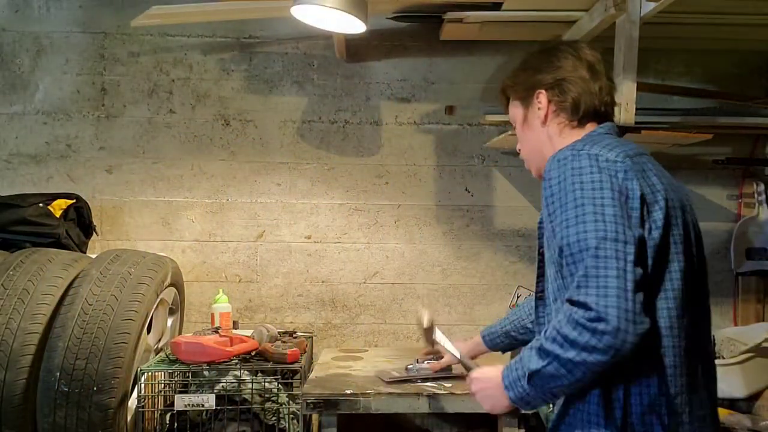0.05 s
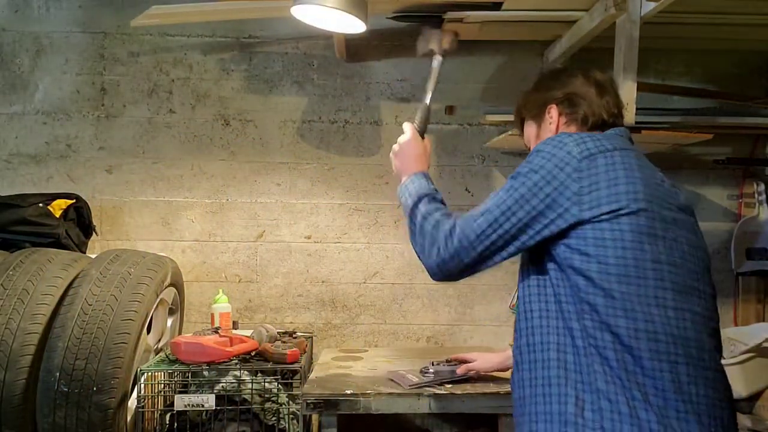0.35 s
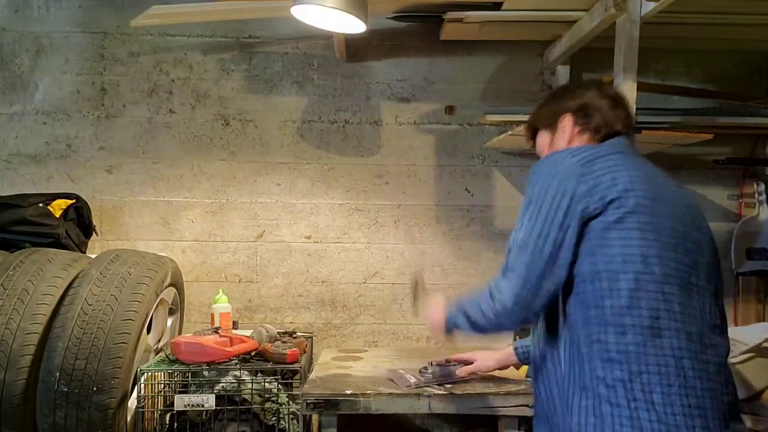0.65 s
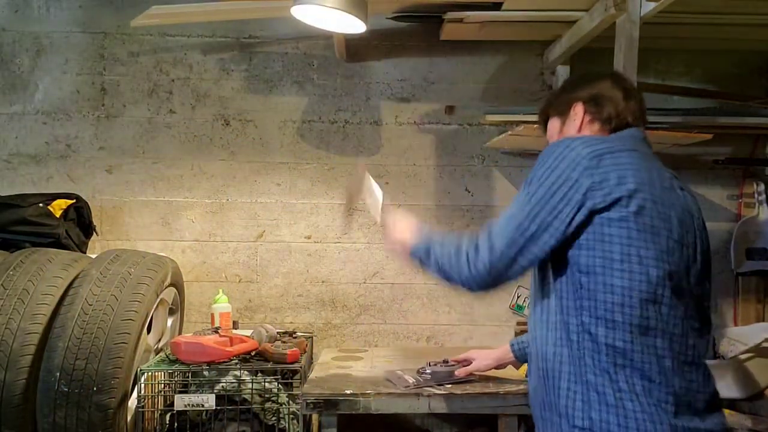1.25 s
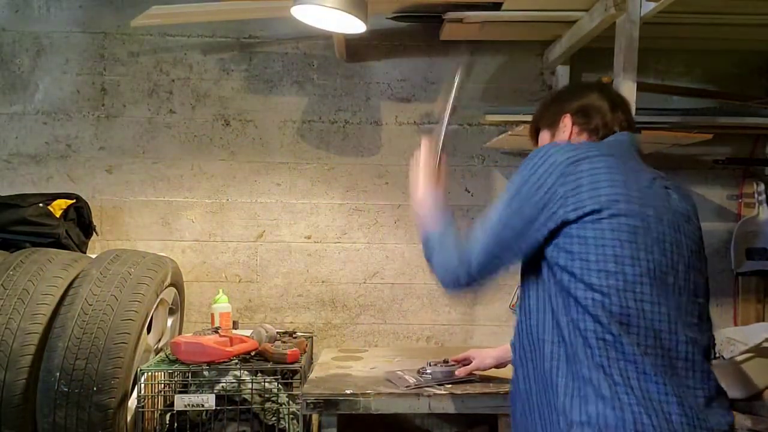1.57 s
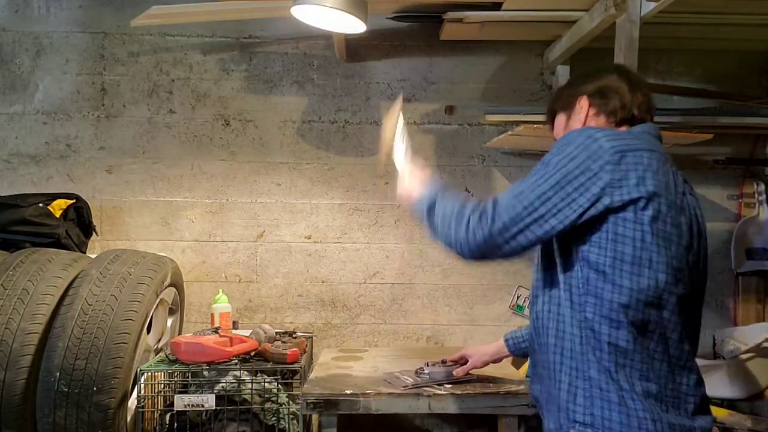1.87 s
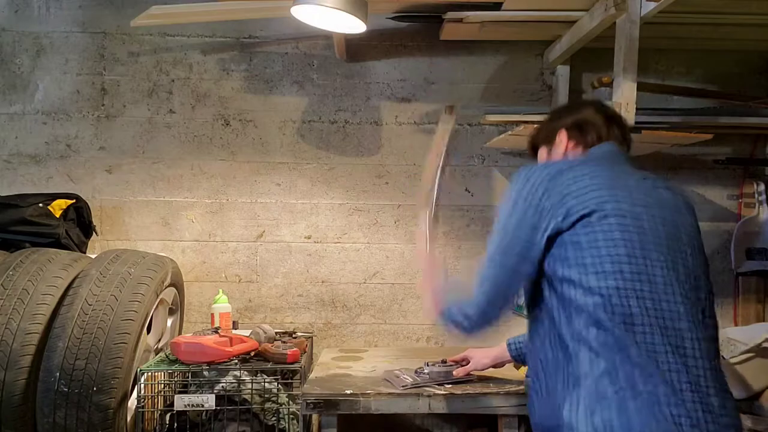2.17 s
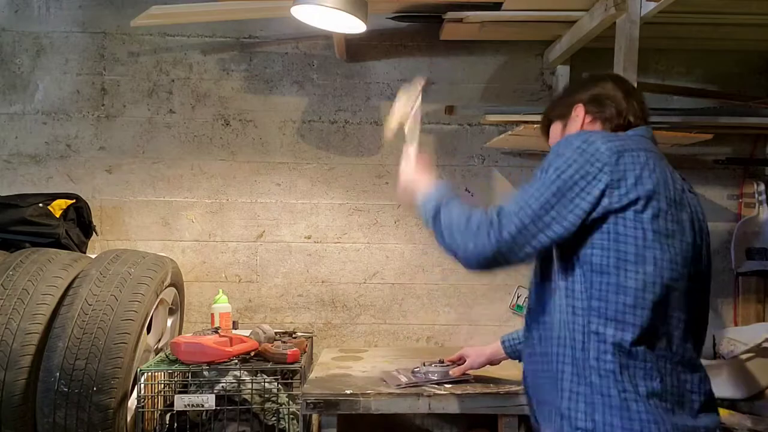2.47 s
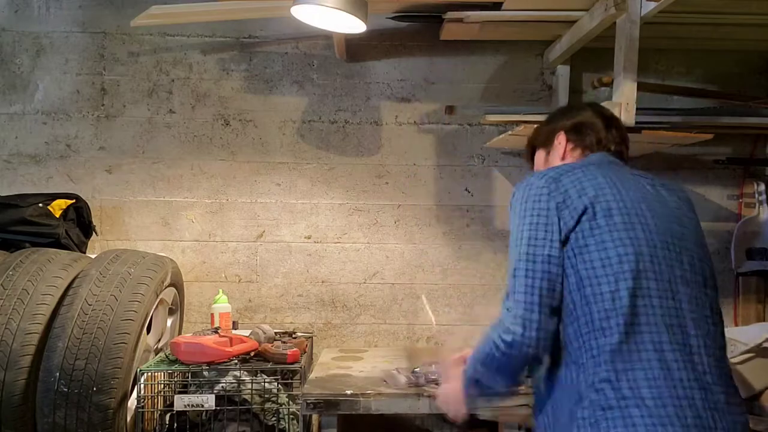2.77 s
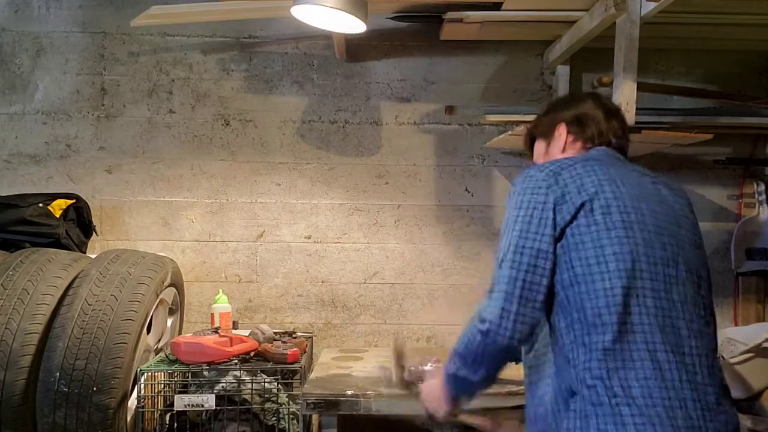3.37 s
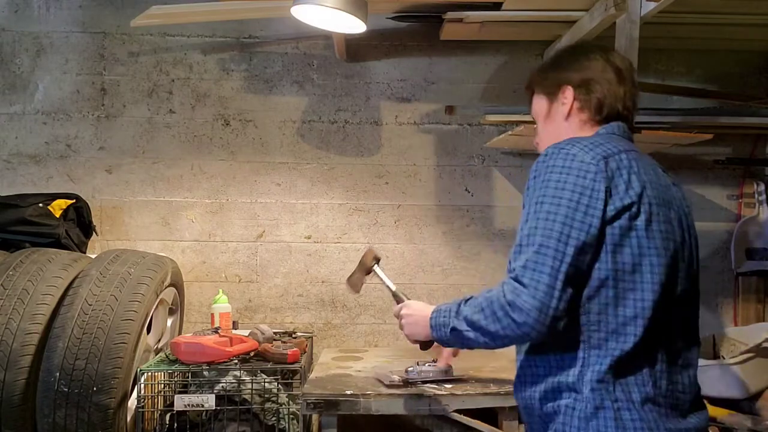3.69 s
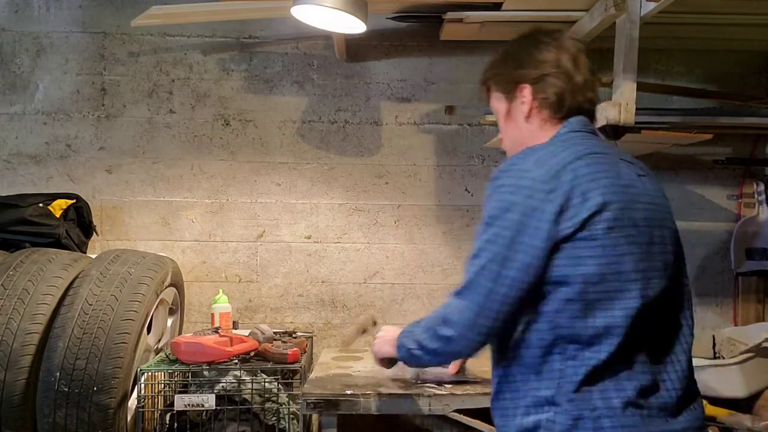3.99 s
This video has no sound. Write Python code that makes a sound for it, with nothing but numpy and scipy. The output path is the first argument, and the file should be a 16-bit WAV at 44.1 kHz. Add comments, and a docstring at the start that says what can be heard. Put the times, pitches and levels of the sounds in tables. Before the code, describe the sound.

In a small workshop, two light knocks sound on a wooden bench. Then a hammer strikes a plastic blister pack six times, about two blows a second. Each loud hit booms in the wood, cracks in the plastic and rings briefly in the room, overloading the close microphone. The pack snaps on the fourth blow and crinkles faintly after the last two. A few light knocks and a short scrape follow.

```python
"""In a small block-walled workshop, a plastic blister pack and a hammer are shifted on a wooden bench
with two light knocks. The hammer comes down six times: each blow booms in the bench, cracks in the pack,
leaves the room ringing and overloads the close microphone. The pack splits on the fourth blow and
crinkles after the last two as the weight comes off. A few more light knocks and a short scrape
follow, over the low rumble of the room."""
import sys
import numpy as np
from scipy import signal
from scipy.fft import rfft, irfft, next_fast_len
from scipy.io import wavfile

SR = 44100
rng = np.random.default_rng(int(sys.argv[2]) if len(sys.argv) > 2 else 0)


def file_out(sig):
    """Save sig as 16-bit WAV at sys.argv[1]."""
    # one column per channel
    cols = np.atleast_2d(sig).T
    # limit, then scale
    lim = np.clip(cols, -1, 1)
    pcm = np.round(lim * 32767).astype(np.int16)
    wavfile.write(sys.argv[1], SR, pcm)


N = 186851
T = np.arange(SR) / SR  # one second of ringing


def undb(db):
    """Decibels to gain."""
    return 10 ** (np.asarray(db) / 20)


def unit(x):
    """Scale to rms 1."""
    return x / np.sqrt(np.mean(x ** 2))


def read(points, hz):
    """Read a curve of (Hz, value) points on a log-frequency axis."""
    point_hz, value = np.transpose(points)
    return np.interp(np.log(hz), np.log(point_hz), value)


def bell(hz, centre_hz, octaves):
    """A smooth hump over frequency, 1 at its centre."""
    return np.exp(-(np.log2(hz / centre_hz) / octaves) ** 2)


def colour(x, gain):
    """Equalise with a gain that is a function of frequency."""
    n = next_fast_len(x.shape[-1] + SR // 4)
    hz = np.maximum(np.arange(n // 2 + 1) * SR / n, 1)
    return irfft(rfft(x, n) * gain(hz), n)[..., :x.shape[-1]]


def fade(t60):
    """Free decay, 60 dB down after t60 seconds."""
    return np.exp(-np.log(1000) * T / t60)


def swell(seconds):
    """Soft attack while a vibration spreads."""
    return 1 - np.exp(-(T / seconds) ** 2)


def add(track, start_s, sound):
    """Mix a sound into a track."""
    i = max(int(start_s * SR), 0)
    n = min(sound.shape[-1], N - i)
    track[..., i:i + n] += sound[..., :n]


def diffuse(size, spacing_m=0.14):
    """Noise from all sides at two microphone ports: alike in the bass, unrelated in the treble."""
    likeness = lambda hz: np.sinc(2 * hz * spacing_m / 343)
    mid = colour(rng.standard_normal(size), lambda hz: np.sqrt((1 + likeness(hz)) / 2))
    side = colour(rng.standard_normal(size), lambda hz: np.sqrt((1 - likeness(hz)) / 2))
    return np.array([mid + side, mid - side])


def room_tone():
    """The still air of the workshop, a low rumble under everything."""
    # spectrum of the air: frequency_hz, relative_db
    air = [(20, -11), (48, -10), (70, 5.5), (100, -15), (180, -18.5), (250, -26.5), (550, -30),
           (950, -29.5), (1300, -35.5), (2000, -47), (3300, -51), (7000, -55), (16000, -61.5)]
    return unit(colour(diffuse(N), lambda hz: undb(read(air, hz))))


def workshop(spectrum):
    """Dense reverb tail of a short sound with this spectrum; the very top dies first."""
    # reverberation of the workshop: frequency_hz, t60_s
    decays = [(250, 0.33), (1000, 0.31), (2500, 0.32), (4000, 0.28), (7000, 0.43), (15000, 0.23)]
    centres = np.geomspace(250, 16000, 7)
    shares = np.eye(len(centres))
    crossover = lambda hz: np.array([[np.interp(np.log(hz), np.log(centres), row)] for row in shares])
    bands = colour(unit(colour(diffuse(len(T)), spectrum)), crossover)
    return sum(band * fade(read(decays, hz)) for band, hz in zip(bands, centres)) * swell(0.0096)


def burst(spectrum, rise_s, t60, wet_db, uneven_db, grain_samples=32):
    """A dense, uneven train of tiny impacts dies away, followed by the room."""
    grains = undb(uneven_db * np.repeat(rng.random(len(T)), grain_samples)[:len(T)])
    direct = unit(colour(diffuse(len(T)) * grains, spectrum)) * swell(rise_s) * fade(t60)
    return direct + undb(wet_db) * workshop(spectrum)


def ring(modes, excite_db, build_cycles, scatter_db, scatter_rad, apart_hz=650, long_wave_hz=200):
    """Struck modes build up over a few cycles and ring out; neighbours swing opposite ways."""
    out = np.zeros((2, len(T)))
    for k, (hz, db, t60) in enumerate(modes):
        # long waves hardly feel where exactly the blow lands
        size, turn = rng.standard_normal(2) * hz / (hz + long_wave_hz)
        # higher modes reach the two ports out of step
        spread = np.array([[.5], [-.5]]) * rng.standard_normal() * hz / apart_hz
        phase = k * np.pi + scatter_rad * turn + spread
        gain = undb(db + excite_db(hz) + scatter_db * size)
        out += gain * swell(build_cycles / hz) * fade(t60) * np.sin(2 * np.pi * hz * T + phase)
    return out


def bench(excite_db):
    """The wooden bench booms in the modes that a contact excites."""
    # modes of the bench: pitch_hz, level_db, t60_s
    modes = [(43, -18, 0.49), (62, -21.5, 0.39), (83.4, -9, 0.34), (101.5, -9, 0.31), (128.3, -1.5, .35),
             (147.3, -11.5, 0.38), (180.9, -0.5, .32), (197.4, -5, .28), (209.6, -3, 0.32), (227, 0, 0.32),
             (259.7, -14, 0.27), (314.7, -6.5, 0.22), (365, -7.5, 0.23), (385, -3, .27), (424.4, 0.5, 0.26),
             (453.3, -3.5, 0.32), (484.5, -11, 0.41), (524.7, -11.5, 0.34), (555.7, -5, 0.3),
             (618, -4, 0.32), (666, -11, 0.13), (705, -14, 0.27), (792, -17, 0.33), (813, -16.5, 0.35),
             (905, -13.5, .26), (1015, -20.5, 0.43), (1054, -15.5, 0.22), (1207, -23.5, 0.38),
             (1338, -19, 0.35)]
    return undb(-11.5) * ring(modes, excite_db, build_cycles=1.9, scatter_db=2.5, scatter_rad=1.7)


def knock(centre_hz, octaves, rise_s, t60):
    """A light touch wakes one damped band of noise and the bench modes around it."""
    hump_db = lambda hz: -80 * np.log10(1 + (np.log2(hz / centre_hz) / octaves / 2) ** 2)
    touch = burst(lambda hz: undb(hump_db(hz)), rise_s, t60, wet_db=-15, uneven_db=8)
    return touch + undb(-11.5) * bench(hump_db)


def clack(t60):
    """The pack is knocked against the bench: a bright clack over a hollow body."""
    bright = knock(centre_hz=1000, octaves=0.72, rise_s=0.0013, t60=t60)
    hollow = knock(centre_hz=454, octaves=0.45, rise_s=0.0059, t60=t60)
    return bright + undb(-3.5) * hollow


def thud(level_db, reference_db=-43.5, db_per_octave=14):
    """A soft push rings the bench top; a heavier one stays longer in contact and thuds lower."""
    pitch_hz = 136.6 * 2 ** ((reference_db - level_db) / db_per_octave)
    board = undb(-5) * knock(centre_hz=194, octaves=0.14, rise_s=0.0068, t60=0.21)
    return undb(level_db) * (knock(pitch_hz, octaves=0.55, rise_s=0.0018, t60=0.23) + board)


def crackle(rise_s, t60, wet_db):
    """Plastic buckles in many tiny snaps."""
    # spectrum of crushed plastic: frequency_hz, relative_db
    plastic = [(200, -16.5), (1000, -1), (2000, 1), (3500, 1.5), (5500, -6.5), (8000, -17), (12000, -12.5),
               (16000, -9.5)]
    return burst(lambda hz: undb(read(plastic, hz)), rise_s, t60, wet_db, uneven_db=18.5)


def tick():
    """The stiff edge of the pack meets the wood."""
    return crackle(rise_s=.0002, t60=0.01, wet_db=-20)


def hammer(tilt_db_per_octave, bass_db, clatter_db, buckle_db, crack_hz, favoured_hz):
    """The hammer crushes the pack and drives the bench; where it lands decides which modes take most."""
    # a bass shelf below 150 Hz, and a narrow lift of the region that the strike point favours
    strike_db = lambda hz: bass_db / (1 + (hz / 150) ** 4) + 4.5 * bell(hz, favoured_hz, octaves=0.18)
    wood = bench(strike_db) + undb(clatter_db - 4) * clatter(tilt_db_per_octave, crack_hz)
    plastic = undb(buckle_db - 23.5) * crackle(rise_s=0.008, t60=0.099, wet_db=-22.5)
    return wood + plastic + undb(-32.5) * room_ring(strike_db)


def clatter(tilt_db_per_octave, crack_hz, crack_db=2):
    """Countless short modes of the bench top and loose tools, lifted around the pitch of the crack."""
    # spectrum of the dense clatter: frequency_hz, relative_db
    spectrum = [(30, -32.5), (70, -11.5), (200, -4.5), (450, 1.5), (700, -3), (1000, -5), (1500, -7.5),
                (2200, -15.5), (3700, -25), (5000, -36), (7500, -55.5), (16000, -55.5)]
    # higher rings of the hammer and the tools on the bench: pitch_hz, level_db, t60_s
    tools = [(1346, 0, .22), (1483, -1, .22), (1528, 0, .24), (1652, -2, .22), (1763, -2, .24),
             (1835, -5, .26), (1921, -8, .22), (2055, -5, .26), (2289, -11, .22), (3870, -17, .16)]
    tilt_db = lambda hz: tilt_db_per_octave * np.log2(np.maximum(hz / 600, 1))
    contact_db = lambda hz: tilt_db(hz) + crack_db * bell(hz, crack_hz, octaves=0.45)
    tone = lambda hz: undb(read(spectrum, hz) + contact_db(hz))
    dense = burst(tone, rise_s=.004, t60=0.17, wet_db=-4.5, uneven_db=11)
    return dense + undb(-26) * ring(tools, contact_db, build_cycles=9.5, scatter_db=3, scatter_rad=3.2)


def room_ring(strike_db):
    """The room and the things in it ring on after a blow; the lowest two modes beat slowly."""
    # long rings of the room: pitch_hz, level_db, t60_s
    modes = [(69.5, 4, .7), (72.5, 3, .65), (123, -11, .8), (183, -12, .85), (285, -29, 1.2),
             (366, -29, 1.2), (436, -26, 1.3), (481, -26, 1.2), (502, -23, 1.3), (629, -29, 1.5),
             (651, -30, 1.5), (743, -31, 1.6)]
    return ring(modes, strike_db, build_cycles=3, scatter_db=-3.5, scatter_rad=0.35)


def boom():
    """A soft, late swell of the deepest ringing."""
    return knock(centre_hz=70, octaves=0.18, rise_s=0.023, t60=0.42)


def split(shell_hz=3780):
    """The plastic gives way in one sharp snap that briefly rings its shell."""
    snap = crackle(rise_s=.0007, t60=.016, wet_db=-27.5)
    shell = burst(lambda hz: bell(hz, shell_hz, .2), rise_s=.0012, t60=.045, wet_db=-22, uneven_db=6)
    return undb(-15.5) * snap + undb(-19) * shell


def crinkle(shell_db):
    """The dented blister springs back with a short crunch."""
    crunch = crackle(rise_s=.02, t60=.06, wet_db=-9.5)
    return crunch + undb(shell_db) * knock(centre_hz=2880, octaves=0.33, rise_s=0.0087, t60=0.088)


def slide():
    """The pack scrapes briefly over the wood."""
    return knock(centre_hz=840, octaves=0.82, rise_s=0.073, t60=0.27)


def scene():
    """Knocks, blows, crinkles and a scrape, laid over the room tone."""
    # hammer blows: start_s, force_db, bass_db, clatter_db, buckle_db, crack_hz, favoured_hz
    blows = [(0.5645, -2, 3, 0, 5, 1100, 328), (1.120, -2.5, 0.5, 2, 6.5, 1398, 501),
             (1.677, -3, 0.5, 1, 2.5, 752, 205), (2.240, -2, -0.5, 2, 0.5, 930, 403),
             (2.799, -2.5, 3, 0, 6.5, 1100, 236), (3.392, -.5, 2, -2, 2, 635, 597)]
    # the pack crinkles as the weight comes off: start_s, level_db, shell_db
    crinkles = [(2.917, -49, 7.5), (3.526, -45.5, 9)]
    # light knocks of pack and hammer on the bench: start_s, clack_db, clack_t60_s, thud_db, tick_db
    knocks = [(0.000, -38.5, 0.094, -30, -52), (0.138, -52.5, 0.29, -49, -49.5),
              (3.778, -57, 0.31, -60, -72.5), (3.920, -63, 0.35, -52, -76),
              (4.016, -29.5, 0.11, -51.5, -50), (4.214, -64, 0.11, -66.5, -77)]
    out = undb(-63) * room_tone()
    for k, (start_s, force_db, *contact) in enumerate(blows):
        # the clatter's treble is rolled off a little more after the first blow
        tilt_db_per_octave = -0.4 if k == 0 else -0.75
        held_db = -10 if k == len(blows) - 1 else 0  # on the last blow the hammer stays down
        add(out, start_s, undb(force_db) * hammer(tilt_db_per_octave, *contact))
        add(out, start_s + .16, undb(force_db + held_db - 31.5) * boom())
    for start_s, level_db, shell_db in crinkles:
        add(out, start_s, undb(level_db) * crinkle(shell_db))
    for start_s, clack_db, t60, thud_db, tick_db in knocks:
        add(out, start_s, undb(clack_db) * clack(t60) + thud(thud_db) + undb(tick_db) * tick())
        add(out, start_s + 0.0062, undb(tick_db - 0.5) * tick())  # the edge bounces once
    add(out, 2.2502, split())
    add(out, 3.962, undb(-30) * slide())
    return out


def record(dry, low_cut_hz=42, top_hz=15900):
    """The ports lose the deepest bass and colour the rest; blows overload the input; the top is cut."""
    # colour of each microphone port: frequency_hz, gain_db
    left_port = [(500, 6), (1200, 2.5), (2200, 3.5), (3600, 1.5), (8000, 1), (11500, 5.5), (15300, 14)]
    right_port = [(500, 7), (1200, 0.5), (2200, -3.5), (3600, 1.5), (8000, 1), (11500, 4.5), (15300, -7)]
    trimmed = signal.sosfilt(signal.butter(2, low_cut_hz, "high", fs=SR, output="sos"), dry)
    coloured = colour(trimmed, lambda hz: undb([read(left_port, hz), read(right_port, hz)]))
    clipped = coloured / (1 + coloured ** 16) ** (1 / 16)
    return signal.sosfilt(signal.ellip(10, .1, 70, top_hz, fs=SR, output="sos"), clipped)


dry = scene()
out = record(dry)
file_out(out)
```